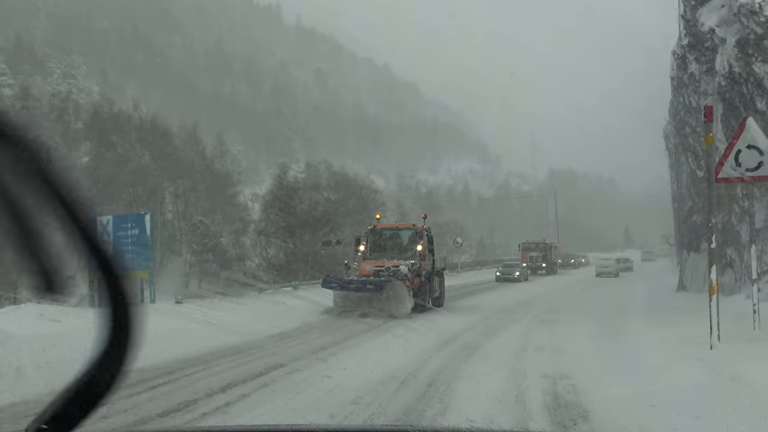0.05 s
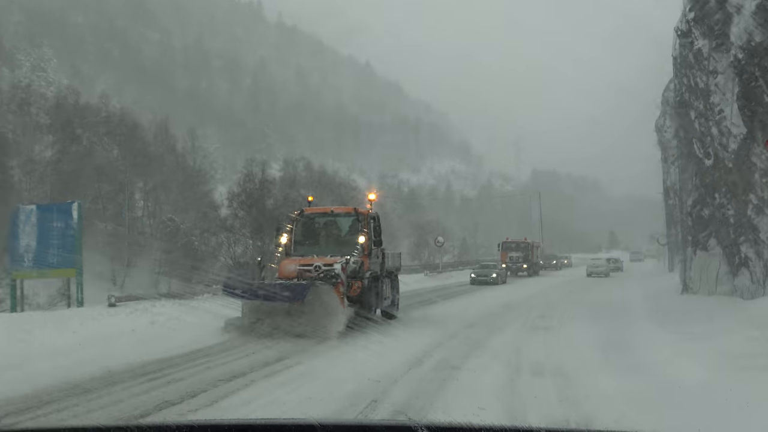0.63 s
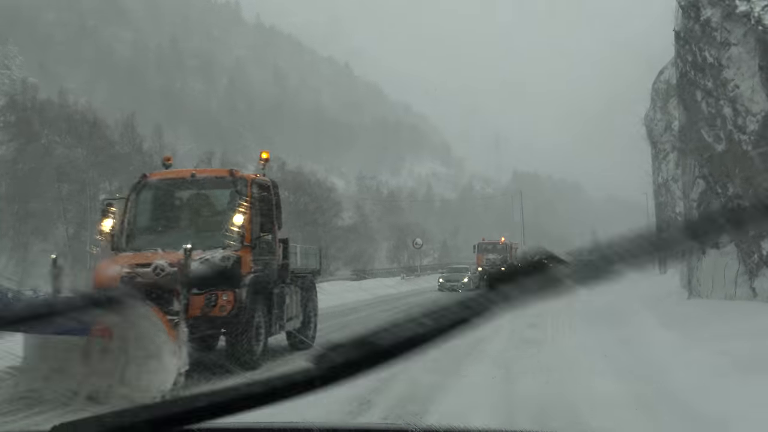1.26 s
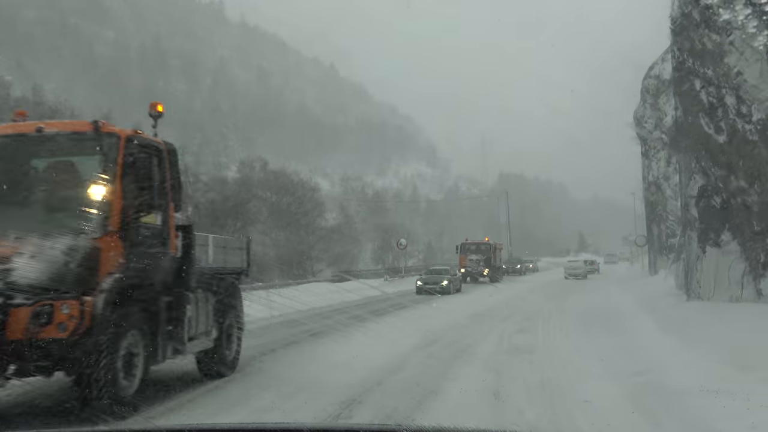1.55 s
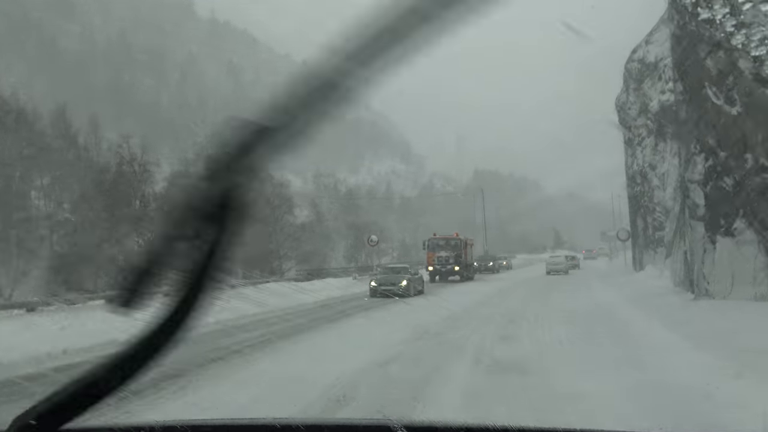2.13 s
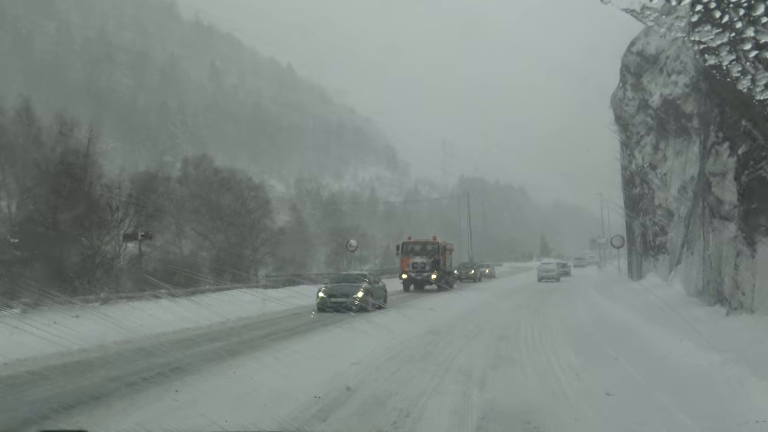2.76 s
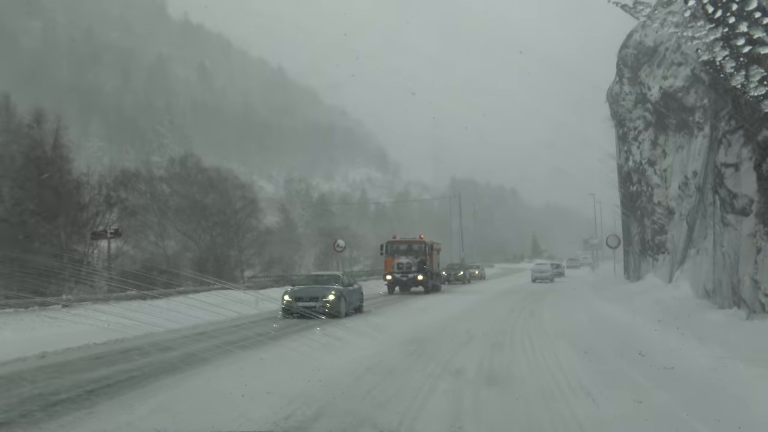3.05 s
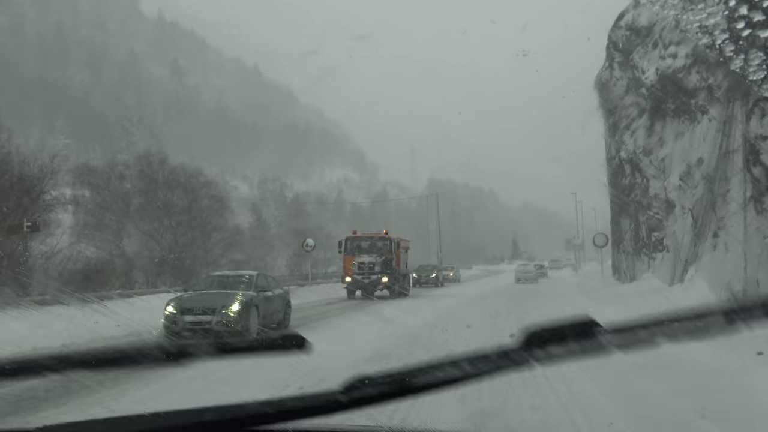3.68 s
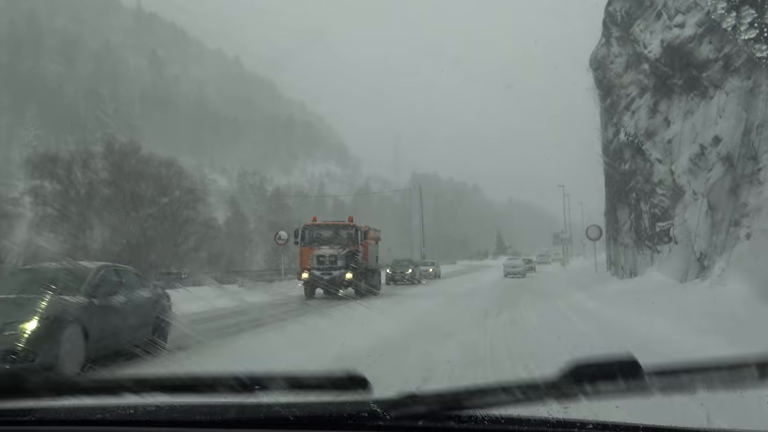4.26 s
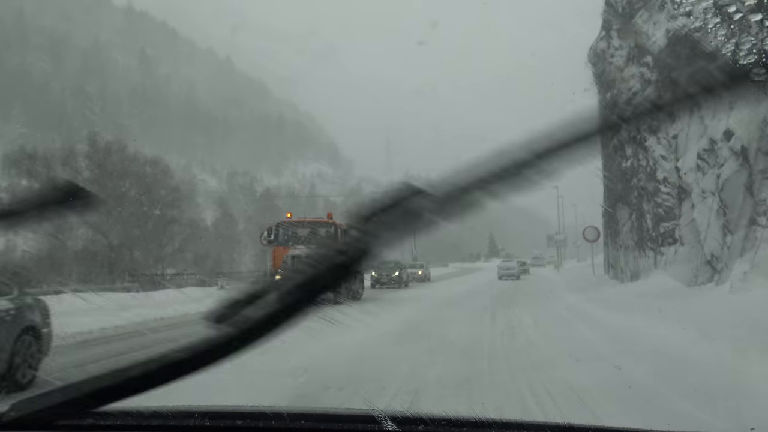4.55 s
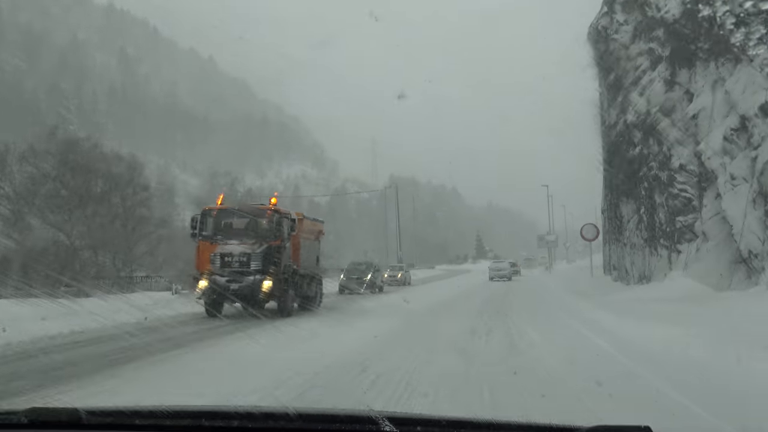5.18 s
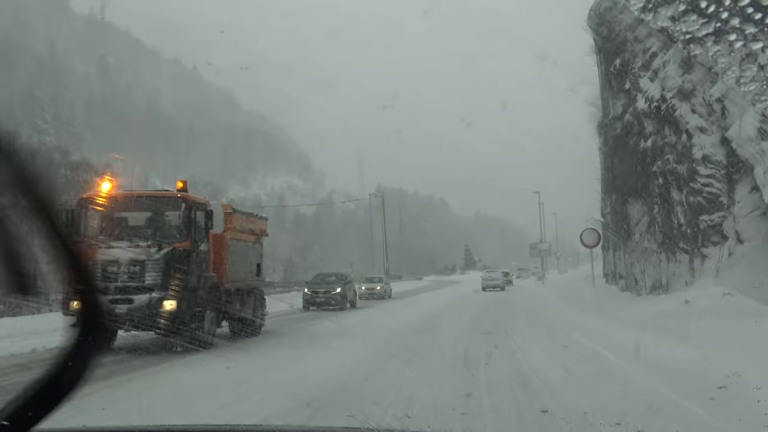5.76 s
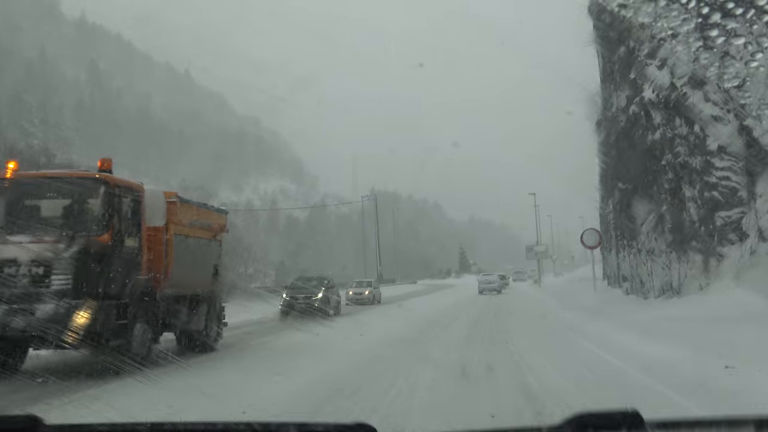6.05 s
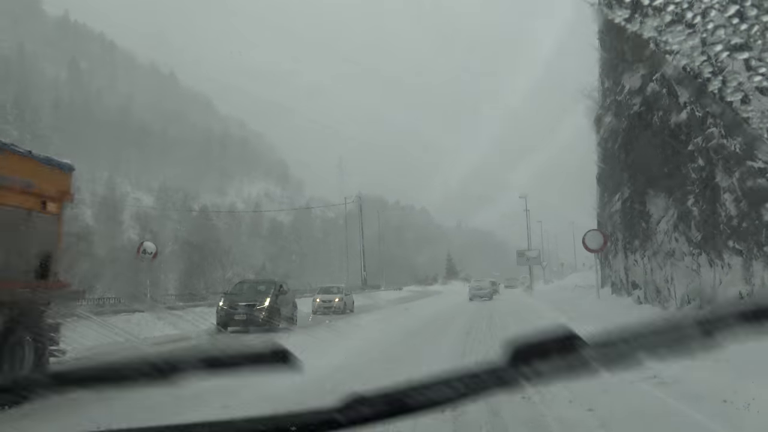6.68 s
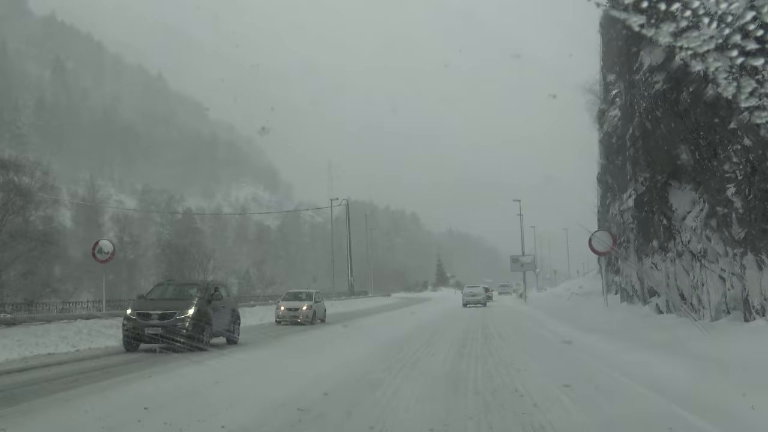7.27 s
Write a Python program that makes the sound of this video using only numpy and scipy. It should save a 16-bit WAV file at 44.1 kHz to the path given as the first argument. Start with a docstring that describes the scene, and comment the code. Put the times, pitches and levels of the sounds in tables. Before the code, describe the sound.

The sound is the inside of a car moving steadily over packed snow, heard in stereo from the dashboard for about seven and a half seconds. Throughout, the tyres make a deep rumble, the engine drones low and muffled, and the demister blows an even rush of air close by. A lump booms softly under the wheels at about 1.2 seconds, with more around 3.8, 4.5, 4.8 and 5.3 seconds. Wipers swish faintly at intervals, near 0.3, 2, 3.4, 5, 6.1 and 7.2 seconds. Snow patters very lightly on the windscreen all the way through. A thin, quiet indicator tick repeats about every 0.4 seconds, alternating softer and harder, and weakens after 5 seconds. Towards 3 seconds a faint high hiss comes up in the airflow and lingers. The car holds its pace to the end.

```python
"""Inside a car driving steadily along a snowy mountain road, stereo microphone on the dashboard.
From the start the tyres rumble on packed snow and shake the body, the engine drones behind the bulkhead
and the demister blows close by; faintly, wipers swish, snow patters and the indicator relay ticks.
Just after one second a lump booms under the wheels, and more follow. Towards three seconds a thin hiss
comes up in the air stream. Around five the relay softens, and it ticks on as the car keeps its pace."""
import sys
import numpy as np
from scipy import signal
from scipy.fft import rfft, irfft
from scipy.io import wavfile
from scipy.ndimage import uniform_filter1d

SR = 44100
rng = np.random.default_rng(int(sys.argv[2]) if len(sys.argv) > 2 else 0)


def wrap_up_sound(samples):
    """Save the sound to the file named by the first command line argument, as 16-bit audio."""
    columns = np.atleast_2d(samples).T
    # keep every value between -1 and 1, then stretch to whole-number steps
    tamed = np.clip(columns, -1, 1)
    steps = np.round(tamed * 32767).astype(np.int16)
    wavfile.write(sys.argv[1], SR, steps)


N = 331632
HZ = np.maximum(np.arange(N // 2 + 1) * SR / N, 1)

# The body heaving on its springs. Each row: time in seconds, level in dB.
SHAKE_LEVEL = [(0, -20), (1.8, -21), (2.1, -19), (4.65, -18), (5.3, -23), (6.5, -20), (7.52, -22.5)]
# Spectra of body shake, wheel boom and tyre roar. Each row: frequency in Hz, relative level in dB.
SHAKE_SPECTRUM = [(8, -32), (15, -12), (21, -14), (26, -1), (33, -9.5), (40, -1.5), (46, -2), (56, -13),
                  (75, -24)]
BOOM_SPECTRUM = [(35, -35), (50, -29), (62, -5.5), (71, -5), (85, 1.5), (100, 1.5), (112, -1), (132, 1.5),
                 (150, -6.5), (166, -1), (182, -7), (200, -11.5), (260, -47)]
ROAR_SPECTRUM = [(140, -51), (200, -3), (250, -1), (315, 0), (420, -6.5), (560, -7), (680, -13.5),
                 (800, -21), (1300, -64)]
# Lumps under the wheels. Each row: centre and half length in seconds, change of boom and of roar in dB.
ROAD_LUMPS = [(.43, .09, 2.5, 1.5), (1.244, 0.091, 6, 0), (3.753, 0.19, 3, -0.5), (4.465, 0.05, 5.5, 1.5),
              (4.81, 0.052, 4, -0.5), (5.288, 0.044, 6, 0.5), (6.14, 0.073, 2.5, 1),
              (7.054, 0.15, 2.5, 0.5)]
# Smooth patches of road. Each row: centre in seconds, dip of the roar in dB.
ROAD_LULLS = [(.64, -3.5), (3.95, -2), (4.95, -3), (6.82, -3)]
# Stretches of firm snow. Each row: centre and half length in seconds, level of the added hum in dB.
FIRM_STRETCHES = [(.5, 0.5, -20), (1.45, 0.13, -17), (3.35, .25, -24.5), (5.65, 0.24, -21), (6.25, .2, -27),
                  (7.35, 0.098, -18)]
# The engine under a nearly steady foot. Each row: time in seconds, firing rate in Hz.
FIRING_RATE = [(0, 83.2), (1, 80.93), (2, 80.25), (3, 82.08), (4, 84.6), (5.3, 84.16), (7.52, 82.2)]
# Firing tone, exhaust drone and firing octave. Each row: time in seconds, level in dB before any trim.
FIRING_LEVEL = [(0, -29), (1, -24.5), (1.9, -26.5), (2.8, -22.5), (4.5, -33), (5.2, -23), (6.1, -26),
                (7.52, -30)]
DRONE_LEVEL = [(0, -30), (.5, -16), (1, -28), (1.5, -17.5), (2.2, -24), (3.8, -24.5), (5.6, -29),
               (6.4, -22.5), (7.52, -29)]
OCTAVE_LEVEL = [(0, -27), (1.5, -33.5), (2.3, -26), (3.9, -41), (5.1, -28.5), (6, -31), (6.8, -28),
                (7.52, -25)]
# The demister's rush at the microphone. Each row: time in seconds, level in dB.
AIR_LEVEL = [(0, -27.4), (1.5, -28), (2, -27.3), (2.4, -28), (3.2, -27.5), (4.7, -27.8), (5.1, -27.5),
             (7.52, -27)]
# That rush before the ducts colour it. Each row: frequency in Hz, relative level in dB.
AIR_SPECTRUM = [(300, -40), (600, -1), (750, 0.5), (900, 1), (1400, -0.5), (1850, -10.5), (2500, -8),
                (3100, -15), (5200, -21.5), (7800, -27.5), (11500, -35.5), (13300, -41), (14200, -42),
                (16000, -48)]
# Peaks and hollows of the ducts and windscreen corner. Each row: centre and width in Hz, gain in dB.
DUCT_RESONANCES = [(822, 45, 4), (920, 45, -3), (1068, 66, 7.2), (1155, 70, 3.8), (1476, 36, 2.8),
                   (1528, 34, -4.6), (1590, 74, 5.8), (2020, 42, 2), (2165, 76, 3), (2241, 37, -4.4),
                   (2320, 115, 3.2), (2640, 120, 1.3), (3215, 70, -2.2), (3450, 240, 4.4), (5820, 320, 2.7),
                   (6330, 330, 5.4), (6780, 540, 2.9), (8100, 200, 1.8), (13350, 500, 2)]
# Wiper swishes. Each row: centre and half length in seconds, pitch and width in Hz, dB before trim.
WIPER_SWISHES = [(0.348, 0.04, 1300, 450, -31), (1.023, .08, 8800, 1200, -62.5),
                 (2.04, 0.065, 1200, 700, -38), (3.44, 0.18, 686, 220, -31.5),
                 (4.441, 0.024, 3900, 1700, -45), (5.05, .11, 1280, 450, -38), (5.07, 0.1, 9000, 2600, -58),
                 (6.14, .06, 3320, 1400, -47), (7.201, 0.18, 1790, 300, -46)]
# The relay's strength. Each row: time in seconds, closing and opening strike in dB before trim.
RELAY_STRIKES = [(0, -39, -27.5), (1.4, -34, -27.5), (3, -41, -28.5), (4.7, -39, -27.5), (5.5, -40, -39)]
# Hiss at the edge of the air stream. Each row: time in seconds, centre in Hz, level in dB before trim.
EDGE_HISS = [(0, 7840, -68), (2.2, 7700, -61), (2.7, 7380, -53), (3.4, 7000, -50), (4.1, 6815, -59),
             (4.45, 6550, -49), (5.15, 6370, -48), (5.5, 6950, -52), (7.52, 6950, -53)]
# Small ticks of the dashboard panels. Each row: start in seconds, strike in dB before trim.
DASHBOARD_TICKS = [(.360, -37), (2.806, -33), (4.382, -39), (5.523, -40)]
# Cabin modes reach the two sides unequally. Each row: frequency in Hz, left minus right in dB.
CABIN_BALANCE = [(25, .4), (42, 1.4), (100, 4.2), (135, 4.6), (200, 2.6), (290, .4), (420, -.5), (690, -.4),
                 (820, 2.5), (990, -.5), (1100, 0), (1180, -2), (1300, 0), (1460, .4), (1590, 5),
                 (1800, -.4), (2100, 1.8), (2330, -.2), (2550, 1.8), (3000, 0)]
# Stereo width of the noises at the microphone. Each row: frequency in Hz, side minus mid in dB.
STEREO_WIDTH = [(60, -32), (300, -26), (700, -25), (950, -21), (1400, -25), (2500, -22), (3000, -27),
                (4000, -33), (5000, -26), (5700, -14), (9000, -12), (14000, -13)]


def road(boom_db, roar_db):
    """Below the floor the wheels shake the body, boom and roar: more on lumps, less on smooth patches."""
    lull_db = sum(db * swell(s, half_length=0.053) for s, db in ROAD_LULLS)
    boom_db += 0.34 * lull_db
    roar_db += lull_db
    for s, half_length, boom_lift, roar_lift in ROAD_LUMPS:
        lump = swell(s, half_length)
        boom_db += boom_lift * lump
        roar_db += roar_lift * lump
    shake = from_db(in_time(SHAKE_LEVEL)[0]) * noise(colour(SHAKE_SPECTRUM), steady_s=0.2)
    boom = from_db(boom_db) * noise(colour(BOOM_SPECTRUM), steady_s=0.14)
    roar = from_db(roar_db) * noise(colour(ROAR_SPECTRUM), steady_s=0.14)
    return shake + boom + roar


def engine(drone_trim_db, octave_trim_db):
    """Four cylinders fire twice a turn; only the low orders get through the bulkhead."""
    crank_hz = in_time(FIRING_RATE)[0] / 2
    orders = {2: in_time(FIRING_LEVEL)[0],
              3: in_time(DRONE_LEVEL)[0] + drone_trim_db,
              4: in_time(OCTAVE_LEVEL)[0] + octave_trim_db}
    return sum(from_db(db) * tone(order * crank_hz, waver=0.14) for order, db in orders.items())


def tread(cruise_hz, base_db):
    """The tyre tread hums, partly following the engine's pitch, and swells on firm snow."""
    firing_hz, = in_time(FIRING_RATE)
    hz = cruise_hz * (firing_hz / firing_hz.mean()) ** 0.469
    firm_snow = sum(from_db(db) * swell(s, half_length) for s, half_length, db in FIRM_STRETCHES)
    return (from_db(base_db) + firm_snow) * tone(hz, waver=0.09)


def demister(flutter_db, flutter_hz, surge_db, surge_hz):
    """Turbulent air close by, coloured by the ducts; eddies make its treble flutter and surge slightly."""
    duct_db = sum(db * bell(hz, width) for hz, width, db in DUCT_RESONANCES)
    air = noise(colour(AIR_SPECTRUM) * from_db(duct_db), steady_s=0.27)
    treble = irfft(rfft(air) * HZ ** 4 / (HZ ** 4 + 2500 ** 4), N)
    unrest_db = flutter_db * wander(flutter_hz) + surge_db * wander(surge_hz)
    return from_db(in_time(AIR_LEVEL)[0]) * (air + treble * (from_db(unrest_db) - 1))


def wipers(trim_db):
    """Rubber slides on the far side of the wet glass: each swish swells and fades."""
    swishes = np.zeros(N)
    friction = rfft(rng.standard_normal(N))
    for s, half_length, hz, width, db in WIPER_SWISHES:
        rub = irfft(friction * bell(hz, width), N)
        swishes += from_db(db + trim_db) * swell(s, half_length) * rub / rub.std()
    return swishes


def relay(start_s, blink_s, hold_s):
    """The indicator relay ticks softly on closing, harder on opening; its housing rings briefly."""
    s, closing_db, opening_db = np.transpose(RELAY_STRIKES)
    closes = np.arange(start_s, N / SR - hold_s, blink_s)
    strikes = [(t, np.interp(t, s, closing_db)) for t in closes]
    strikes += [(t, np.interp(t, s, opening_db)) for t in closes + hold_s]
    contact = ticks(strikes, hz=11200, t60=.0004, trim_db=-1.8)
    housing = ticks(strikes, hz=12500, t60=.004, trim_db=-21)
    return contact + housing


def edge_hiss(trim_db, width_hz):
    """A narrow band of turbulence at the edge of the air stream; its centre wanders."""
    hz, hiss_db = in_time(EDGE_HISS)
    eddies = noise(1 / (1 + (HZ / width_hz) ** 2), steady_s=.2)
    carrier = np.sqrt(2) * np.sin(2 * np.pi * np.cumsum(hz) / SR)
    return from_db(hiss_db + trim_db) * eddies * carrier


def snow(per_s, smallest_db, hz, spread_db):
    """Icy flakes of all sizes patter on the windscreen, just ahead of the microphone."""
    size_db = smallest_db + spread_db * np.minimum(rng.exponential(1, N), 4)
    polarity = rng.choice([-1, 1], N)
    lands = rng.random(N) < per_s / SR
    return ring(from_db(size_db) * polarity * lands, hz, t60=.0008)


def ticks(strikes, hz, t60, trim_db):
    """Tiny hard contacts, each a brief bright ring."""
    clicks = np.zeros(N)
    for s, db in strikes:
        clicks[round(s * SR)] = from_db(db + trim_db)
    return ring(clicks, hz, t60)


def ring(clicks, hz, t60):
    """Each click sets off a ring of about its own height, falling 60 dB in t60 seconds."""
    decay, angle = from_db(-60 / (t60 * SR)), 2 * np.pi * hz / SR
    return signal.lfilter([1, 0, -1], [1, -2 * decay * np.cos(angle), decay ** 2], clicks + 1e-18) / 2


def tone(hz, waver):
    """A sine of rms near 1 on a pitch curve; strength and phase waver a few times a second."""
    slow = irfft(rfft(rng.standard_normal((2, N))) * np.exp(-(HZ / 5) ** 2), N)
    sway, slip = waver * slow / slow.std()
    phase = 2 * np.pi * (np.cumsum(hz) / SR + rng.random())
    return np.sqrt(2) * (1 + sway) * np.sin(phase + slip)


def noise(gains, steady_s):
    """Coloured stereo noise whose rms stays near 1 over stretches longer than steady_s."""
    mid, side = rfft(rng.standard_normal((2, N))) * gains
    mid = irfft(mid, N)
    side = irfft(side * from_db(in_pitch(STEREO_WIDTH)), N)
    span = int(steady_s * SR)
    power = uniform_filter1d(uniform_filter1d(mid ** 2, span), span)
    return np.array([mid + side, mid - side]) / np.sqrt(power)


def wander(hz):
    """A random curve of spread 1, moving mostly slower than hz."""
    curve = irfft(rfft(rng.standard_normal(N)) / (1 + (HZ / hz) ** 2), N)
    return curve / curve.std()


def swell(s, half_length):
    """A rounded rise and fall of height 1 around a moment."""
    distance = (np.arange(N) / SR - s) / half_length
    return np.exp(-distance ** 2) * (np.abs(distance) < 4)


def bell(hz, width_hz):
    """A rounded peak of height 1 on the frequency axis."""
    return np.exp(-2 * np.minimum(((HZ - hz) / width_hz) ** 2, 20))


def colour(points):
    """Gain at every frequency, silent beyond the ends of the spectrum."""
    return from_db(in_pitch(points, outside=-np.inf))


def in_pitch(points, outside=None):
    """A spectrum's value at every frequency; beyond its ends it holds, or takes the value given."""
    hz, value = np.transpose(points)
    return np.interp(np.log(HZ), np.log(hz), value, outside, outside)


def in_time(rows):
    """One curve for each column after the time, a value for every sample."""
    s, *columns = np.transpose(rows)
    return [np.interp(np.arange(N) / SR, s, column) for column in columns]


def from_db(db):
    """Decibels to gain."""
    return 10 ** (np.asarray(db) / 20)


def scene():
    """All sources meet at the dashboard, tilted between left and right by the cabin's modes."""
    cabin = road(boom_db=-17.5, roar_db=-22.5)
    cabin += tread(cruise_hz=94.7, base_db=-30.5)
    cabin += engine(drone_trim_db=-2.5, octave_trim_db=-0.7)
    cabin += demister(flutter_db=.45, flutter_hz=35, surge_db=.25, surge_hz=6)
    cabin += edge_hiss(trim_db=-4.0, width_hz=300)
    cabin += wipers(trim_db=1.5)
    cabin += relay(start_s=.1925, blink_s=.8164, hold_s=.4015)
    cabin += ticks(DASHBOARD_TICKS, hz=10500, t60=.0006, trim_db=-.5)
    cabin += snow(per_s=90, smallest_db=-55, hz=11500, spread_db=3.9)
    lean_db = in_pitch(CABIN_BALANCE) / 2
    sides = from_db([lean_db, -lean_db])
    return irfft(rfft(cabin) * sides / sides.mean(axis=0), N)


def record(dry):
    """Behind the microphone the highest peaks are rounded and the top cut steeply; the sound fades in and out
    over a few milliseconds at its ends."""
    ceiling, cutoff_hz = .95, 15700
    rounded = dry / (1 + (dry / ceiling) ** 8) ** (1 / 8)
    eased = rounded * signal.windows.tukey(N, .004 * SR / N)
    return irfft(rfft(eased) / np.sqrt(1 + (HZ / cutoff_hz) ** 400), N)


dry = scene()
out = record(dry)
wrap_up_sound(out)
```